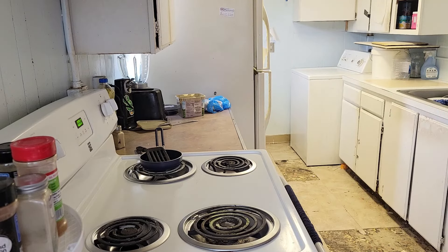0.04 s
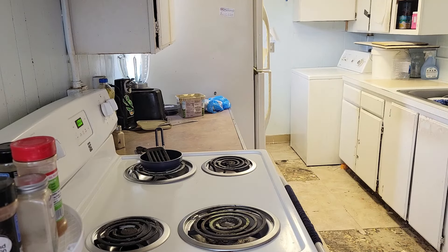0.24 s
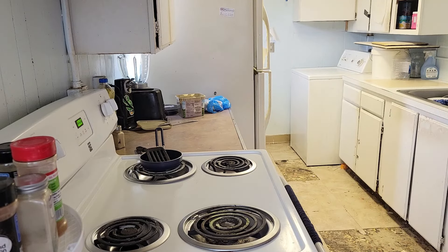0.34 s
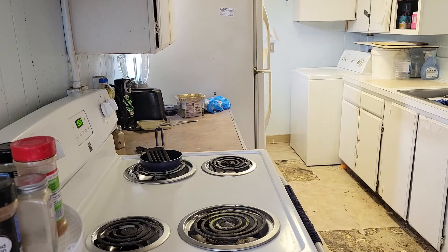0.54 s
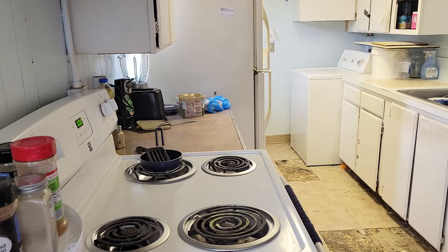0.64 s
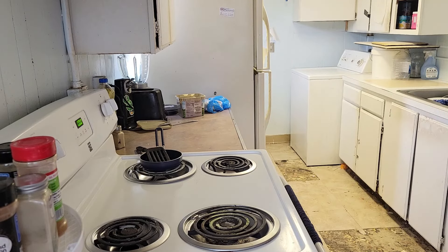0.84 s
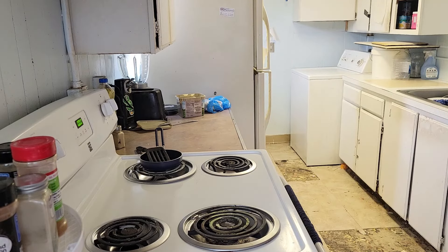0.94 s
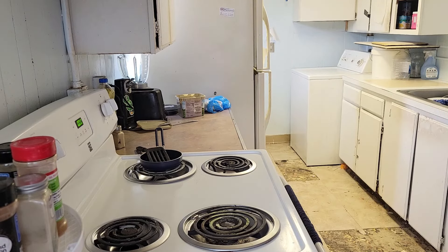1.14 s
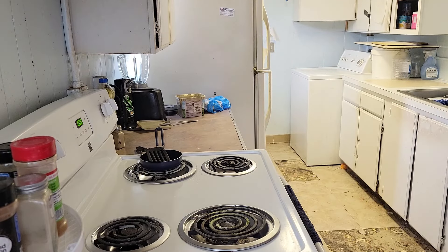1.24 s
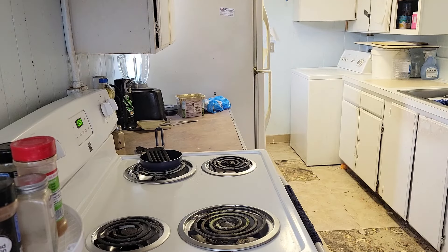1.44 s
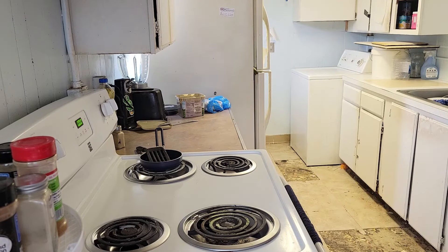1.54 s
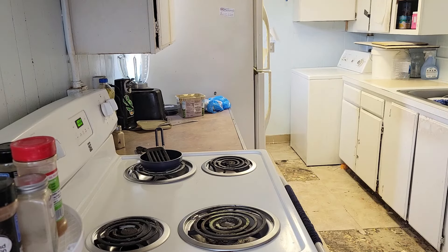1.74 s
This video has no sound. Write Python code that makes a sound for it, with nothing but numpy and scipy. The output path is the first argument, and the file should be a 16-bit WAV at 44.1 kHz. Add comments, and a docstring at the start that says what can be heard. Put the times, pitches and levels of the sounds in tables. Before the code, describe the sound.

A microwave door clicks lightly at about 0.2 seconds, then scrapes, rattles and thumps against its metal case from 0.35 to 0.55. The latch snaps shut at 0.6 with a brief ring, and a faint hiss fades by 1 second. A soft bump comes near 1.3, then quiet rustling from 1.5. The door is a few steps away, slightly right, over a steady low kitchen appliance hum.

```python
"""Over a low appliance drone, a microwave oven's handle takes the strain, a few steps from a spaced
microphone pair and a little to the right, in a hard-walled kitchen. The latch hooks scrape, the door
thumps and rattles its sheet-metal case, and the sprung latch snaps home: each contact is a chatter of
tiny impacts smeared by the walls, and the hard ones ring the metal. A faint hiss lingers, the door
comes to rest with a bump, and something rustles softly at the end."""
import sys
import numpy as np
from scipy import signal
from scipy.fft import rfft, irfft, next_fast_len
from scipy.io import wavfile

SR = 44100
rng = np.random.default_rng(int(sys.argv[2]) if len(sys.argv) > 2 else 0)


def transcribe(u):
    """Save the signal u as a 16-bit wav file named by the first command-line argument.

    u: samples, shape (n,) or (channels, n), limited to [-1, 1]; the rate is SR.
    q: integer samples, one column per channel.
    """
    v = np.clip(np.atleast_2d(u).T, -1, 1)
    q = np.round(v * 32767).astype(np.int16)
    wavfile.write(sys.argv[1], SR, q)


N = 79380

# Contacts at the door: t/s, relative level/dB, rise/s, tilt/(dB per octave)
HANDLE_PRESSES = [(.190, -35.5, 0.0044, -4.5), (.202, -32.5, 0.009, 6.5), (.220, -28.5, 0.0011, 0),
                  (.262, -40.5, 0.0015, -7.5), (.315, -46, 0.0071, 4)]  # the hand loads the door
DOOR_KNOCKS = [(.351, -26, 0.0023, -0.5), (.384, -44, 0.0035, -7), (.416, -11.5, 0.0053, -1),
               (.444, -15, 0.0015, 0.55), (.472, -13, 0.0013, 0.5), (.489, -12, 0.0041, -0.5),
               (.537, -30.5, 0.0035, -3), (.566, -13, 0.0079, -2)]  # the door meets the case
HOOK_SCRAPES = [(.186, -48, 0.0015, 2), (.214, -46, 0.0059, 7), (.262, -52, .004, 4),
                (.304, -52.5, 0.0018, 3), (.334, -30.5, 0.0038, -5.5), (.344, -29, 0.002, 2),
                (.377, -29, 0.0036, -0.5), (.417, -19, .004, -3), (.448, -40, 0.0022, 10),
                (.486, -32, 0.0021, 17)]  # the hooks ride over their catches
LATCH_SNAPS = [(.592, -29, .007, 2), (.599, -22, 0.0093, 7), (.605, -14, .004, 1.7),
               (.612, -15, 0.0018, -1.02), (.662, -31, 0.0048, 1.5)]  # the sprung latch goes home
REST_BUMPS = [(1.274, -37, .004, 1)]  # the door comes to rest
# Case and counter take the weight: t/s, relative level/dB
CASE_THUMPS = [(0.216, -33), (0.338, -28.5), (0.377, -24.5), (0.418, -20.5), (.455, -40), (.494, -18.5),
               (0.513, -24.5), (0.626, -49)]
# Spectra of the contacts: f/Hz, relative density/dB
PRESS_SPECTRUM = [(120, -4), (200, -22), (330, -0.5), (480, -5), (600, 0.5), (900, 0.5), (1100, -1.5),
                  (1600, -1.5), (2100, -1), (2600, -10), (4200, -9), (5000, -23.5), (9800, -39),
                  (15500, -49)]
KNOCK_SPECTRUM = [(80, -41), (170, 0.5), (240, -11), (320, 0.5), (420, -4.5), (590, -1.5), (850, -3),
                  (1100, 0), (1900, -3.5), (2700, -5.5), (4200, -5), (5000, -15.5), (7000, -19),
                  (10000, -24), (15500, -32)]
SCRAPE_SPECTRUM = [(300, -8), (1200, 11.5), (3500, 4.5), (5500, 2.5), (8500, -1.5), (10800, -9.5),
                   (13500, 1.5), (16000, -9)]
SNAP_SPECTRUM = [(150, -23), (260, -11), (520, -3.5), (850, -8.5), (1120, -1), (1400, -7.5), (1900, -3.5),
                 (2450, -10), (3800, -3.5), (5600, -6.5), (6600, -9), (8500, -8.5), (10000, -20),
                 (11500, -11.5), (15500, -26)]
BUMP_SPECTRUM = [(60, -10), (120, -6), (240, 4.5), (400, -7.5), (620, -31), (830, -11), (1020, -34),
                 (1320, -16), (2400, -32), (2900, -30), (3650, -21), (4600, -60), (15000, -59)]
THUMP_SPECTRUM = [(20, -21), (45, -5.5), (100, 9.5), (170, 10.5), (250, -10), (340, -5), (550, -14),
                  (1000, -30)]
# How long the parts buzz after a contact: f/Hz, t60/s
PANEL_DECAY = [(150, 0.1), (1000, 0.084), (4000, 0.059), (12000, 0.063)]
LATCH_DECAY = [(300, 0.15), (2000, 0.1), (6000, 0.028), (14000, 0.028)]
# Modes of the case, and of the latch with its spring: f/Hz, relative level/dB, t60/s
CASE_MODES = [(118.3, -10.5, 0.49), (169.7, -4.5, 0.35), (277, -24, 0.13), (336.5, -15.5, 0.29),
              (466.6, -10, 0.13), (597, -7.5, 0.39), (718, -12.5, 0.43), (1058, -8, 0.4), (1110, -29, 0.14),
              (1224, -14, 0.16), (1458, -15, .4), (1550, -24, 0.29), (2225, -26, 0.18), (2440, -25, 0.56)]
LATCH_MODES = [(420, -14, .45), (525, -11, .65), (1128, -7, .3), (1235, -13, .35), (1885, -8, .3),
               (1927, -13, .35), (2245, -24, .55), (2660, -21, .35), (3675, -29, .65), (3740, -26, .55),
               (3830, -16, .28), (5292, -31, .4)]
# Swell and fade of the hiss: t/s, level/dB
HISS_LEVELS = [(.62, -82), (.72, -61.5), (.85, -64.5), (.95, -74), (1.08, -102)]
# Course of the rustle: t/s, relative body level/dB, relative fizz level/dB
RUSTLE_LEVELS = [(1.44, -59, -77), (1.458, -64, -79), (1.498, -51.5, -66.5), (1.534, -53, -59),
                 (1.54, -44.5, -56.5), (1.612, -44.5, -57), (1.618, -50.5, -63), (1.702, -41, -57),
                 (1.742, -49.5, -60), (1.75, -45, -54), (1.782, -51, -62.5), (1.8, -52, -58)]
# Spectra of the rustle's body, the high fizz and the appliance drone: f/Hz, relative density/dB
RUSTLE_SPECTRUM = [(30, -3), (70, 11), (130, -19), (230, 15.5), (350, 1), (600, -3.5), (1400, -0.5),
                   (2300, -7.5), (3500, -14.5), (5000, -17), (9000, -40)]
FIZZ_SPECTRUM = [(2500, -13), (5000, -6), (8000, 0), (11000, -6), (14000, -4), (16000, -7)]
DRONE_SPECTRUM = [(15, -31), (30, -17), (45, 3.5), (64, 1.5), (120, 0), (145, -3), (210, 2.5), (270, -4),
                  (340, -4.5), (430, -16.5), (520, -10.5), (620, -18), (850, -16.5), (1500, -21.5),
                  (2500, -35), (3500, -35), (6000, -43.5), (10000, -49.5), (13000, -45.5), (15500, -47)]
# Motor tones: f/Hz, level/dB
MOTOR_TONES = [(80.5, -51.5), (119.5, -49), (200, -46.5), (222, -49.5), (291, -55), (533, -61), (851, -62),
               (904, -69.5)]
# Reverberation of the kitchen: f/Hz, t60/s
KITCHEN_DECAY = [(100, 0.8), (500, 0.29), (1500, 0.33), (4000, 0.25), (8000, 0.19), (15000, 0.13)]

MIC_GAP_M, SOUND_M_PER_S = 0.15, 343
LEFT_LAG_S, PAN_DB = 0.0004385, 0.62  # a source on the right is later and softer at the left microphone


def door():
    """Handle, panel, hooks and latch, a few steps off and a little to the right."""
    press = amp(11.5) * contacts(HANDLE_PRESSES, PRESS_SPECTRUM, PANEL_DECAY,
                                 direct_db=1, grain_db=2.5, modes=CASE_MODES, ring_db=-9)
    knock = amp(8) * contacts(DOOR_KNOCKS, KNOCK_SPECTRUM, PANEL_DECAY,
                              direct_db=-5.5, grain_db=3, modes=CASE_MODES, ring_db=-12.5)
    scrape = amp(9) * contacts(HOOK_SCRAPES, SCRAPE_SPECTRUM, PANEL_DECAY, direct_db=-10.5, grain_db=2.5)
    snap = amp(9.5) * contacts(LATCH_SNAPS, SNAP_SPECTRUM, LATCH_DECAY,
                               direct_db=0.5, grain_db=1, modes=LATCH_MODES, ring_db=-19)
    bump = amp(5) * contacts(REST_BUMPS, BUMP_SPECTRUM, PANEL_DECAY, direct_db=-1, grain_db=1.5)
    return pan_right(press + knock + scrape + snap) + bump + thumps()


def contacts(rows, spectrum, decay, direct_db, grain_db, modes=(), ring_db=0, tilt_from_hz=840):
    """Each contact is a dying chatter of tiny impacts; a hard one also rings the metal."""
    out, t = np.zeros((2, N)), np.arange(SR) / SR
    for start, db, rise, tilt in rows:
        impacts = rng.standard_normal(N) * amp(grain_db * wobble(900))
        colour = lambda hz: amp(along(spectrum, hz) + tilt * np.log2(1 + hz / tilt_from_hz))
        chatter = dying(unit(filtered(impacts, colour)), decay)
        attack = (1 - np.exp(-t / rise)) ** 2
        rattle = kitchen(chatter * attack, direct_db)
        ring = amp(ring_db) * metal_ring(modes, t) * attack
        add(out, start, amp(db) * (rattle + ring))
    return out


def metal_ring(modes, t, flutter_cycles=0.13, scatter_db=1):
    """Unsteady modes, struck differently each time; the higher, the less alike at the two microphones."""
    out = np.zeros((2, len(t)))
    for hz, db, t60 in modes:
        lag_s = LEFT_LAG_S + rng.normal() * MIC_GAP_M / SOUND_M_PER_S / 2
        phase_apart = np.array([[-.5], [.5]]) * hz * lag_s
        cycles = hz * t + rng.random() + phase_apart + flutter_cycles * wobble(31.5)[:len(t)]
        out += amp(db + scatter_db * rng.normal() - 60 * t / t60) * np.sin(2 * np.pi * cycles)
    return out


def thumps(t60=0.11, rise_s=0.0026):
    """Dull pushes through case and counter."""
    out, t = np.zeros((2, N)), np.arange(SR) / SR
    envelope = amp(-60 * t / t60) * (1 - np.exp(-t / rise_s))
    for start, db in CASE_THUMPS:
        push = noise(THUMP_SPECTRUM)[:SR] * envelope
        push /= np.sqrt(np.sum(push ** 2) / (SR * t60 / 10))  # energy of rms 1 over a tenth of t60
        add(out, start, amp(db) * kitchen(push, direct_db=2))
    return out


def hiss():
    """A faint high hiss hangs on after the snap."""
    times, db = np.transpose(HISS_LEVELS)
    level_db = np.interp(np.arange(N) / SR, times, db, left=-120, right=-120)
    return amp(level_db) * diffuse(FIZZ_SPECTRUM)


def rustle(body_gain_db=7, fizz_gain_db=3, fade_in_s=0.028):
    """Soft rubbing, perhaps of clothing, just right of centre: a dull body and a fine fizz."""
    t = np.arange(N) / SR
    times, body_db, fizz_db = np.transpose(RUSTLE_LEVELS)
    body = amp(np.interp(t, times, body_db) + body_gain_db) * diffuse(RUSTLE_SPECTRUM)
    fizz = amp(np.interp(t, times, fizz_db) + fizz_gain_db) * diffuse(FIZZ_SPECTRUM)
    fade_in = np.clip((t - times[0]) / fade_in_s, 0, 1)
    return pan_right((body + fizz) * fade_in)


def appliances(drone_db=-38.5, waver_db=2, drift_rad=1):
    """Room tone: a steady low drone all round, with slightly unsteady motor tones in the centre."""
    hum, t = np.zeros(N), np.arange(N) / SR
    for hz, db in MOTOR_TONES:
        peak = np.sqrt(2) * amp(db + waver_db * wobble(7.42))
        phase = 2 * np.pi * (hz * t + rng.random()) + drift_rad * wobble(8.54)
        hum += peak * np.sin(phase)
    return amp(drone_db) * diffuse(DRONE_SPECTRUM) + hum


def kitchen(x, direct_db, build_s=0.001):
    """The direct sound reaches the right microphone first; the walls answer from all sides."""
    t = np.arange(SR) / SR
    white = diffuse([(20, 0), (20000, 0)])
    tail = dying(white, KITCHEN_DECAY) * (1 - np.exp(-t / build_s))
    walls = signal.fftconvolve(x[None], tail / np.linalg.norm(tail[0]), axes=1)[:, :SR]
    direct = filtered(x, lambda hz: np.exp(-2j * np.pi * hz * np.array([[LEFT_LAG_S], [0]])))
    return (walls + amp(direct_db) * direct) / np.hypot(1, amp(direct_db))


def diffuse(spectrum):
    """Noise from all sides, as the spaced pair hears it: alike in the bass only."""
    coherence = lambda hz: .97 * np.sinc(2 * hz * MIC_GAP_M / SOUND_M_PER_S)
    mid = filtered(noise(spectrum), lambda hz: np.sqrt((1 + coherence(hz)) / 2))
    side = filtered(noise(spectrum), lambda hz: np.sqrt((1 - coherence(hz)) / 2))
    return unit(np.array([mid + side, mid - side]))


def pan_right(x):
    """Left microphone a touch down, right a touch up."""
    return x * amp([[-PAN_DB], [PAN_DB]])


def dying(x, decay):
    """The first second of x, each frequency fading at its own speed."""
    hz, t, bins = signal.stft(x[..., :SR], SR, nperseg=256)
    fade = amp(-60 * t / along(decay, hz)[:, None])
    return signal.istft(bins * fade, SR, nperseg=256)[1][..., :SR]


def noise(spectrum):
    """Coloured noise of rms 1."""
    return unit(filtered(rng.standard_normal(N), lambda hz: amp(along(spectrum, hz))))


def wobble(rate):
    """A random curve of rms 1, with rate knots a second."""
    knots = rng.standard_normal(int(N * rate / SR) + 4)
    return unit(np.interp(np.arange(N) * rate / SR, np.arange(len(knots)), knots))


def filtered(x, response):
    """x through a complex frequency response."""
    n = x.shape[-1]
    padded = next_fast_len(n + 8192)
    return irfft(rfft(x, padded) * response(np.fft.rfftfreq(padded, 1 / SR)), padded)[..., :n]


def along(points, hz):
    """Interpolates (f/Hz, value) points on a log frequency axis."""
    freqs, values = np.transpose(points)
    return np.interp(np.log(hz + 1), np.log(freqs + 1), values)


def add(track, start_s, x):
    """Mixes x into the track at start_s."""
    part = track[:, round(start_s * SR):][:, :x.shape[-1]]
    part += x[..., :part.shape[-1]]


def amp(db):
    """Decibels to gain."""
    return 10 ** (np.asarray(db) / 20)


def unit(x):
    """x at rms 1."""
    return x / np.sqrt(np.mean(x ** 2) + 1e-20)


def scene():
    """The door over the sounds of the kitchen, as they reach the microphones."""
    return door() + hiss() + rustle() + appliances()


def record(dry):
    """The recorder clips at full scale and keeps nothing above 15.8 kHz."""
    return filtered(np.clip(dry, -1, 1), lambda hz: hz < 15800)


dry = scene()
out = record(dry)
transcribe(out)
```